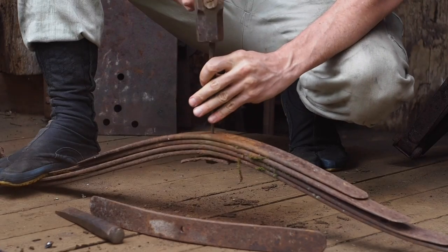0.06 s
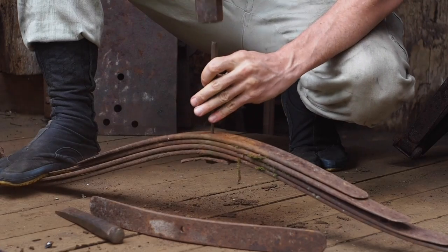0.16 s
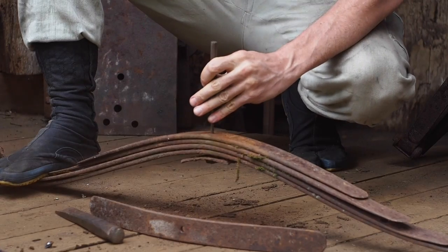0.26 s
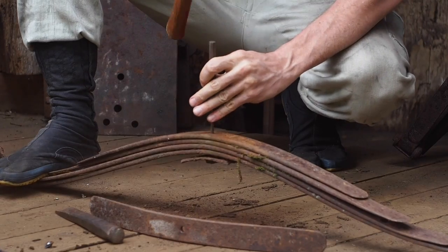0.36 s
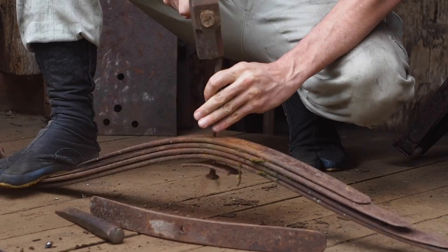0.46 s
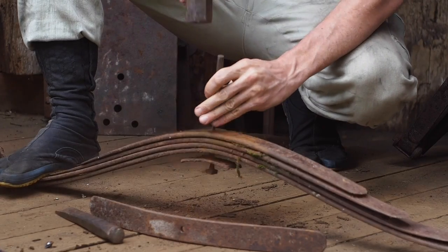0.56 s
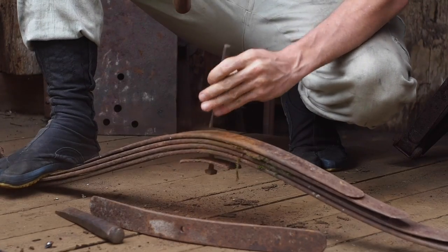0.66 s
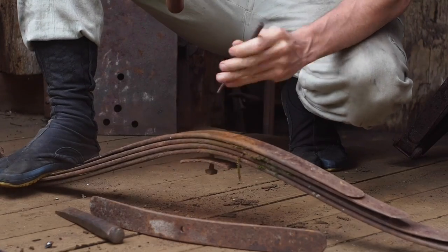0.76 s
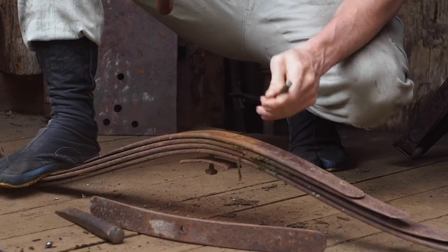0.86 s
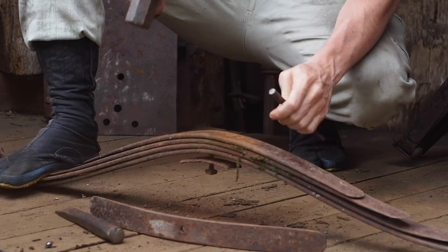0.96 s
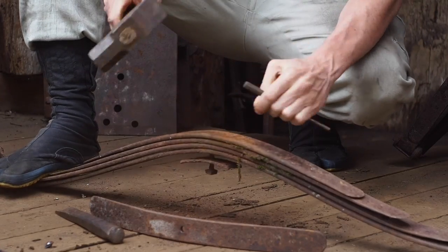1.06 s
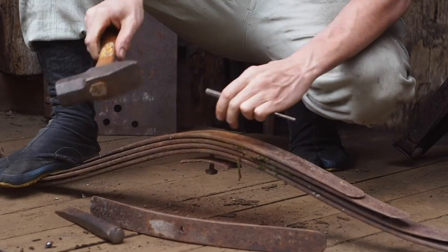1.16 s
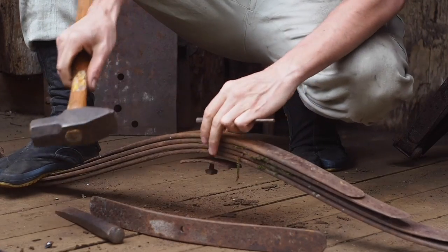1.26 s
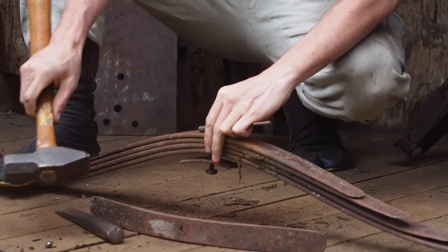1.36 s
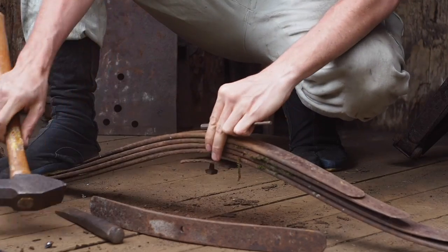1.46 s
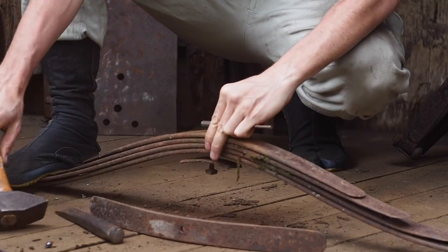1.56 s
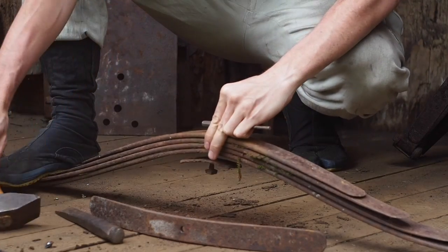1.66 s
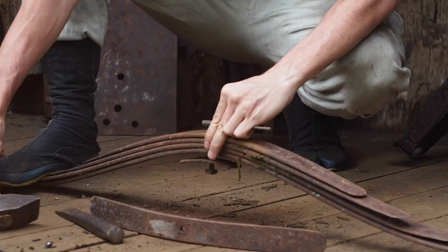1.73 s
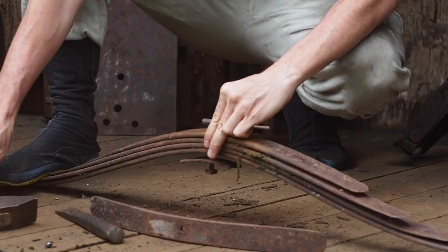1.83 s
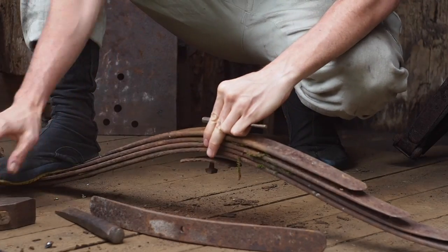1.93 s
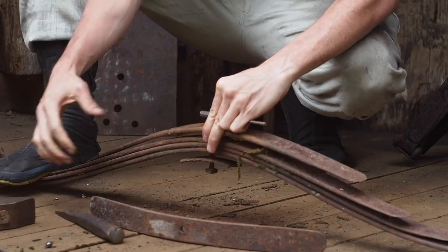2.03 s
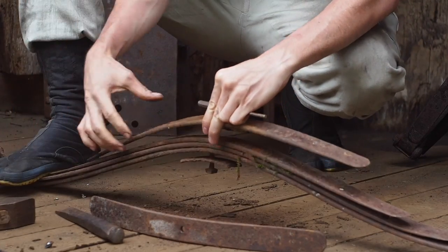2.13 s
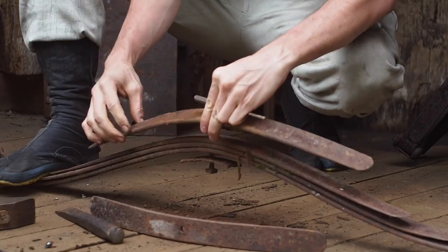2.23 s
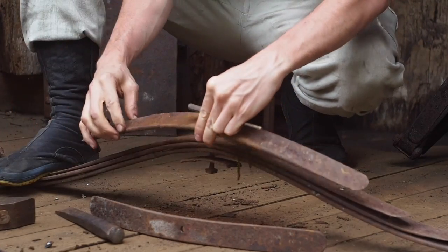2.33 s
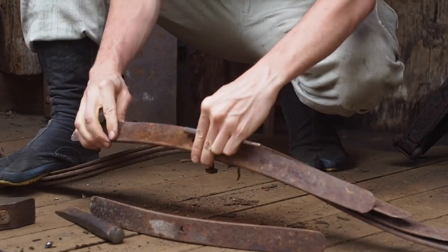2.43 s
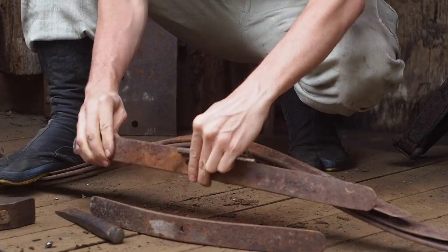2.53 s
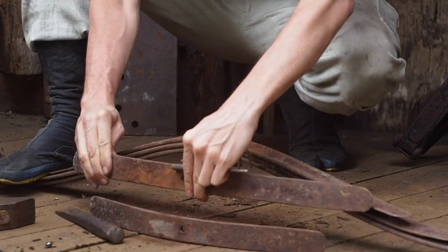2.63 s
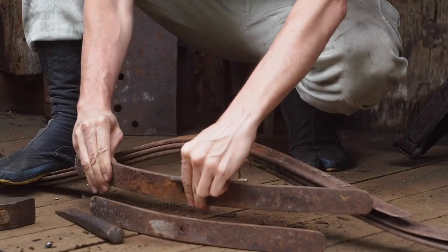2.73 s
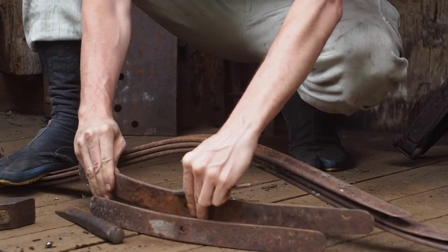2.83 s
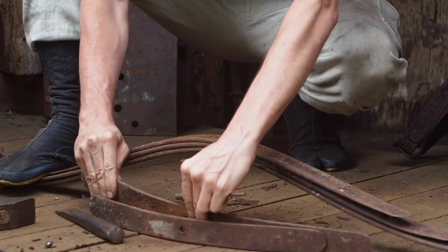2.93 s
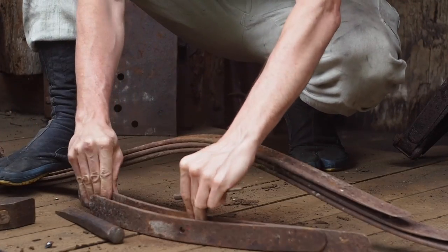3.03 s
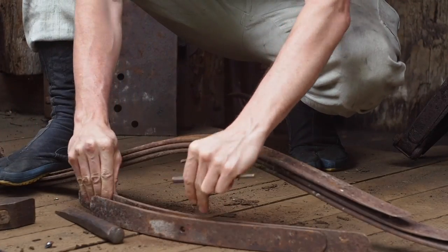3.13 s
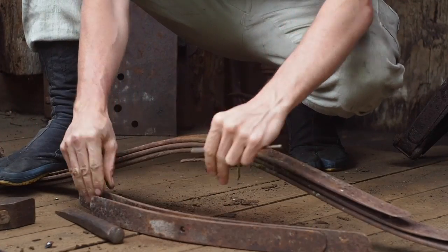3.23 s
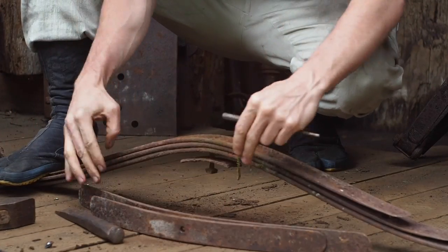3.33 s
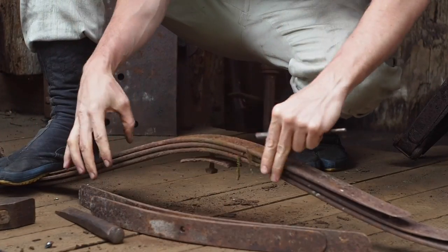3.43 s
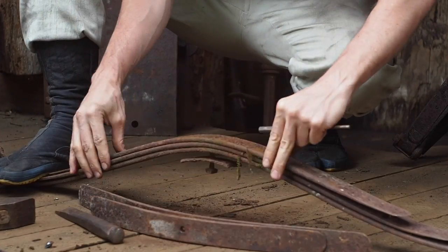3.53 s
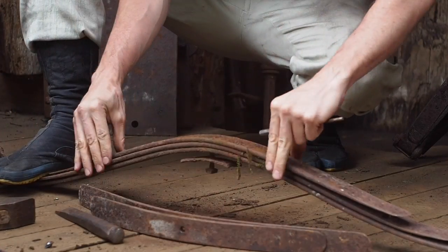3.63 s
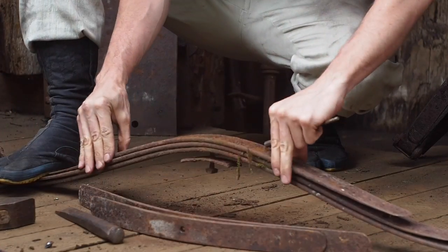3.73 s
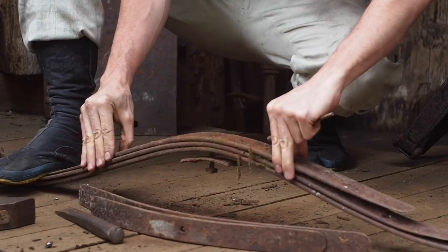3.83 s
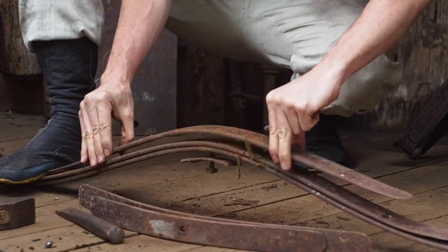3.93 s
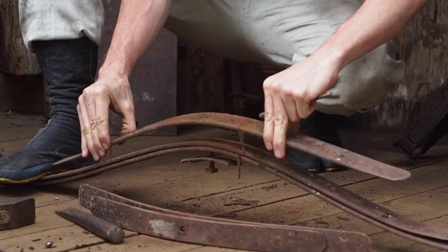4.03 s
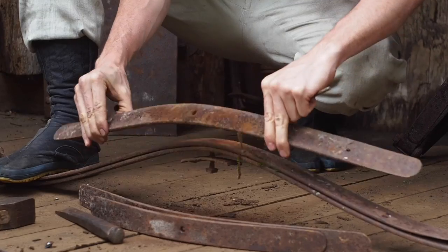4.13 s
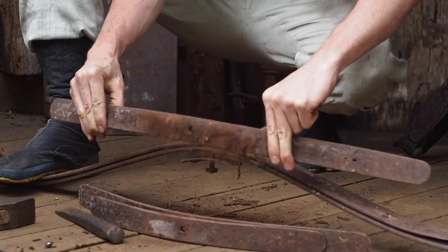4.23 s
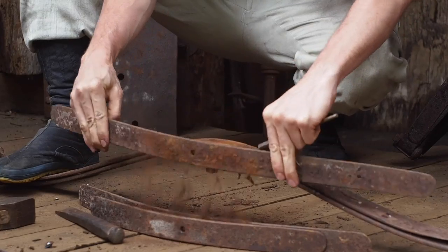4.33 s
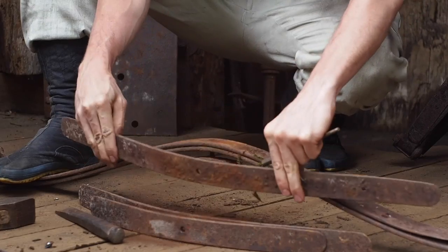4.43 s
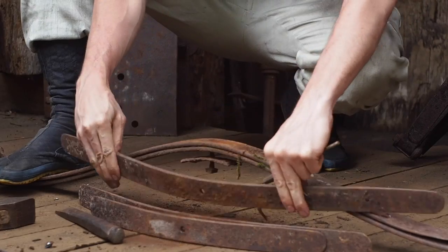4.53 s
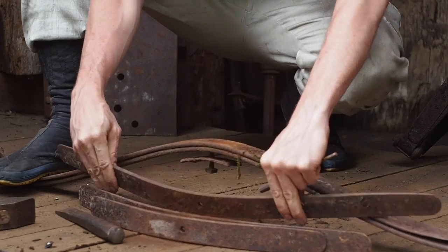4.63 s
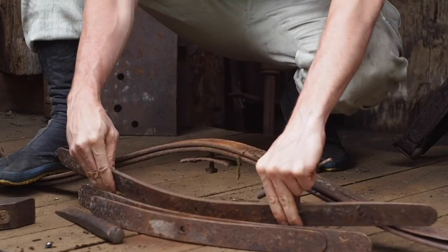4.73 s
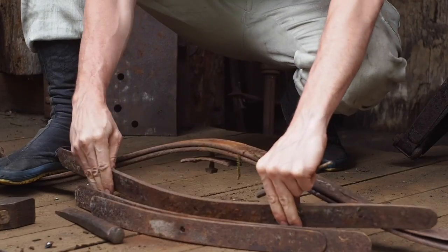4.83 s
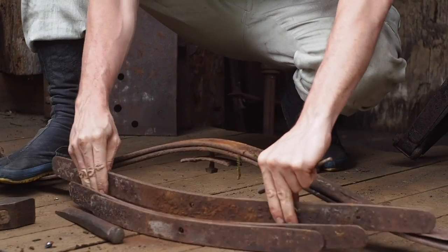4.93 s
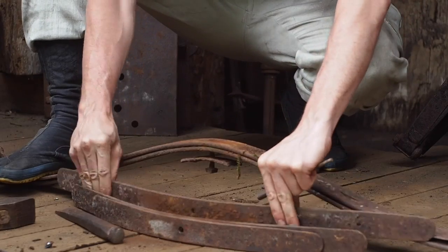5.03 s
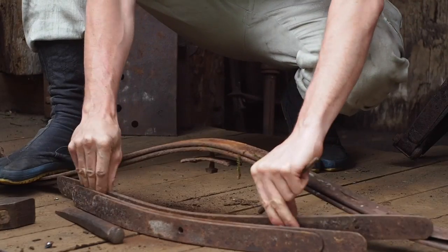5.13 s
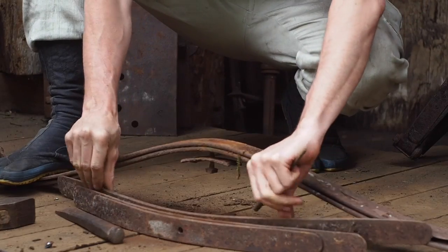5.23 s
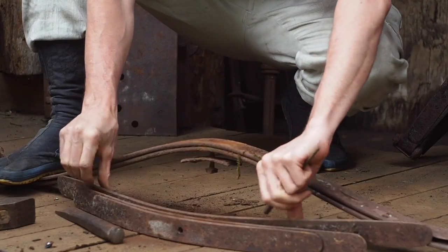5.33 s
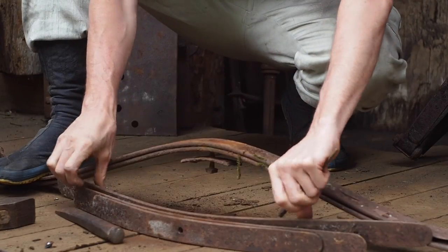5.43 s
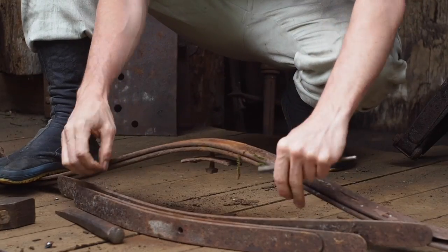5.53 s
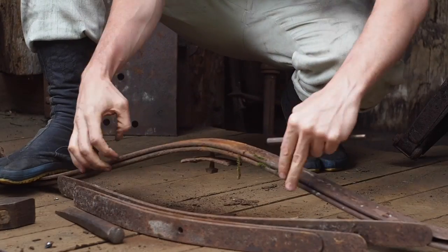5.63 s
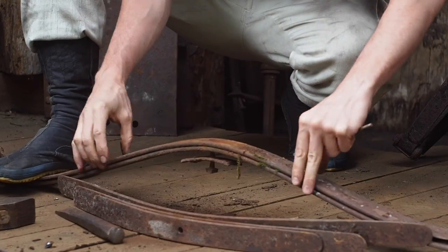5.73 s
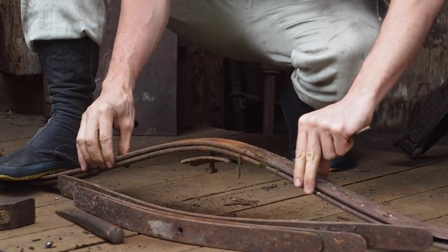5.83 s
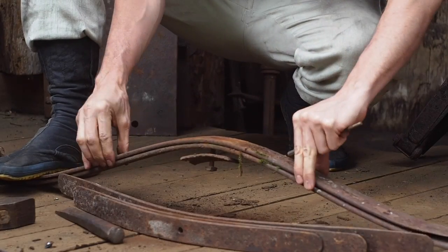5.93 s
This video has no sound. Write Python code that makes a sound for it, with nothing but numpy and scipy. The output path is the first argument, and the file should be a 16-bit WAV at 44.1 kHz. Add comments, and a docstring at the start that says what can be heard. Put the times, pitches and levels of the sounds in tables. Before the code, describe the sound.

Near stereo microphone, short woody room, faint low air noise. Two hammer strikes make stacked spring steel rattle and a punch sing thinly; a small pin tinkles. After a ringing clink the hammer lands and tips over on floorboards. One leaf clanks free and drops with a thud; a longer one is lifted quietly, then grates harshly onto the first and thumps down.

```python
"""A soft airy rush (shaped noise) fills a workshop while two hammer blows crack and make a punch sing.
The top leaf of a rusty spring chatters after each blow (damped sine modes plus grit); the loose pin falls.
The hammer topples before the loud drags: leaves are lifted off, dragged over each other (stick-slip grains)
and laid on the planks, which thud (noise slaps and wood modes). At the end the next leaf is nudged."""
import sys
import numpy as np
from scipy import signal
from scipy.fft import rfft, irfft, next_fast_len
from scipy.io import wavfile
from scipy.ndimage import map_coordinates

SR = 44100
rng = np.random.default_rng(int(sys.argv[2]) if len(sys.argv) > 2 else 0)


def unload_wav(signal):
    """Save mono or channel-first audio to the path in sys.argv[1] as 16-bit WAV at rate SR, clipped to [-1, 1]."""
    wavfile.write(
        sys.argv[1],
        SR,
        np.round(np.clip(np.atleast_2d(signal).T, -1, 1) * 32767).astype(np.int16),
    )


N = 263718

# Airy rush. Each row: frequency in Hz, density in dB per Hz.
AIR_SPECTRUM_HZ_DB = [(15, -51.5), (25, -28), (95, -9.5), (124, -7), (223, -7.5), (391, -2.5), (539, -6.5),
                      (599, -15.5), (742, -11), (1270, -21), (1450, -24), (1650, -24.5), (2470, -30.5),
                      (4100, -28.5), (14800, -42)]
# Rush level. Each row: time in seconds, level in dB.
AIR_LEVEL_S_DB = [(0, -56), (.8, -51.5), (1.3, -52.5), (2.3, -54), (2.7, -57.5), (3.4, -54), (3.9, -56),
                  (4.2, -52), (4.5, -57.5), (5.98, -56.5)]
# Stereo width of the rush. Each row: frequency in Hz, side gain in dB.
AIR_WIDTH_HZ_DB = [(60, -17), (400, -12), (1000, -6), (3000, 3), (10000, 0)]
# Stereo width of the near reflections. Each row: frequency in Hz, side gain in dB.
ROOM_WIDTH_HZ_DB = [(100, -23.5), (400, -20), (1000, -18), (2500, -7), (5000, -5.5), (9000, -1.5)]
# Channel balance. Each row: frequency in Hz, left minus right in dB.
BALANCE_HZ_DB = [(150, 1.3), (1000, 0), (5000, -2), (10000, -2)]
# Room tail. Each row: frequency in Hz, t60 in seconds.
ROOM_HZ_T60_S = [(150, 0.14), (1000, 0.58), (5000, 0.1), (12000, 0.06)]

# Weight landing on the planks. Each row: start in seconds, level in dB, contact hardness in Hz,
# time between rebounds in seconds, first rebound against the landing in dB.
THUDS = [(.040, -30, 1300, 0.019, -3), (0.435, -36.5, 1600, 0.029, -1), (0.484, -40.5, 1600, 0.023, -11),
         (0.554, -36.5, 1710, .02, -14.5), (1.597, -24, 675, .011, -2.5), (1.64, -36, 454, 0.011, -5.5),
         (1.896, -41, 404, 0.026, -6.5), (2.003, -33.5, 740, 0.028, -1), (2.075, -38, 990, 0.019, -3),
         (2.451, -42.5, 450, 0.018, -11), (2.956, -35.5, 825, .02, -33), (3.0577, -22, 760, .025, -18),
         (4.553, -36, 1020, 0.027, 4), (4.779, -42, 1190, .02, -3.5), (5.143, -25.5, 960, .011, -16),
         (5.812, -44.5, 810, 0.022, -9)]
# Plank modes. Each row: frequency in Hz, level in dB, t60 in seconds.
PLANK_MODES = [(114.4, -23.5, 0.11), (145, -12.5, 0.6), (166, -10, .25), (276, -1, 0.1084),
               (317, 3.5, 0.17), (352, 4, 0.14), (455.7, 2.5, .11), (596, 0, 0.052), (684, -7.5, .11),
               (908, 0.5, 0.043), (1081, -3.5, 0.14), (1443, -9.5, .1), (1790, -5, 0.13), (2020, -9, 0.059),
               (2180, -14, 0.079)]
# Wood noise. Each row: frequency in Hz, density in dB per Hz.
WOOD_SPECTRUM_HZ_DB = [(25, -26), (70, -10.5), (130, -2.5), (300, 1), (550, -2.5), (900, -6.5), (1300, -6),
                       (2600, -3), (4000, -13.5), (5500, -14), (9000, -20), (15000, -33.5)]
# Wood noise decay. Each row: frequency in Hz, t60 in seconds.
WOOD_HZ_T60_S = [(100, 0.26), (300, 0.18), (1000, 0.085), (3000, 0.13), (10000, .12)]
# Hammer toppling and bouncing on the boards. Each row: start in seconds, level in dB, contact hardness in Hz.
HAMMER_FALLS = [(1.912, -17.5, 5560), (1.924, -38, 6540), (2.002, -28, 1730)]
# Hammer knock modes. Each row: frequency in Hz, level in dB, t60 in seconds.
HAMMER_MODES = [(495, -15, 0.08), (654, -18, 0.042), (713.3, -2, 0.16), (950, 3.5, 0.13), (988, 2.5, 0.073),
                (1555, 2.5, 0.11), (1610, -4, 0.1), (1760, 4, 0.064), (2200, -19, 0.15), (2590, 5, 0.094),
                (2637, -32, 0.046), (2970, -16, 0.039), (3540, 1.5, 0.038), (3700, -14, 0.096),
                (5150, -7.5, 0.089)]

# Steel sliding on rust. Each row: start in seconds, length in seconds, rasp in dB, plank rumble in dB.
STROKES = [(0.919, .25, -83, -76), (1.617, 0.34, -69.5, -77), (2.444, 0.31, -64.5, -81),
           (2.768, 0.28, -59, -60), (4.181, 0.23, -63.5, -98.5), (4.593, 0.09, -47.5, -43),
           (4.812, 0.17, -45.5, -43), (5.02, 0.12, -47.5, -44), (5.164, 0.1, -50.5, -44.5),
           (5.751, .025, -55.5, -66.5), (5.828, 0.049, -47, -51.5), (5.904, 0.022, -42, -48.5)]
# Rasp of rust. Each row: frequency in Hz, density in dB per Hz.
RASP_SPECTRUM_HZ_DB = [(350, -27.5), (700, -8.5), (1200, -5.5), (1500, -7.5), (2200, -6.5), (4000, -3),
                       (6000, -8), (8500, -8.5), (10500, -21), (12000, -29.5), (15000, -45)]

# Contacts of the loose pin as it jumps and falls. Each row: start in seconds, ring in dB, clatter in dB,
# brightest frequency in Hz, spread in octaves, damping in dB/s.
PIN_HITS = [(.466, -24.5, -32.5, 6900, 0.35, 30), (.485, -37.5, -41, 7000, 1, 110),
            (.553, -36, -36, 4220, 0.5, 11), (.653, -40, -53.5, 7900, 0.075, 230)]
# The next leaf nudged on the stack. Each row: start in seconds, ring in dB, clatter in dB,
# brightest frequency in Hz, spread in octaves, damping in dB/s.
STACK_HITS = [(5.807, -38.5, -36, 3180, 0.81, 200), (5.896, -49, -46, 3720, 0.27, 50),
              (5.925, -35, -46, 3040, 0.71, 30)]
# Contacts of the longer leaf. Each row: start in seconds, ring in dB, clatter in dB,
# brightest frequency in Hz, spread in octaves, damping by hand or stack in dB/s.
LONG_LEAF_HITS = [(3.705, -64, -60, 4400, 0.2, 50), (3.96, -60, -62.5, 6300, 0.68, 42),
                  (4.019, -51.5, -61, 3750, 0.23, 9.2), (4.35, -60, -72, 5000, 0.36, 40),
                  (4.555, -48, -52, 2000, 0.2, 120), (4.574, -54, -40, 3510, 0.37, 150),
                  (4.778, -49.5, -50.5, 2000, 0.31, 64), (5.018, -46, -39, 5530, 1.5, 140),
                  (5.048, -34, -33.5, 3300, 0.83, 130), (5.057, -46, -36.5, 8000, 0.73, 110),
                  (5.264, -50.5, -55, 4970, 0.65, 210), (5.380, -39.5, -43.5, 4000, 0.68, 11)]
# Contacts of the short top leaf. Each row: start in seconds, ring in dB, clatter in dB,
# brightest frequency in Hz, spread in octaves, damping by hand or stack in dB/s.
TOP_LEAF_HITS = [(.010, -69, -56, 4600, 0.48, 100), (1.3183, -24.5, -37.5, 7500, 0.63, 2),
                 (1.582, -61, -58, 4600, .5, 62), (2.434, -48, -34, 4200, 0.76, 201),
                 (2.4404, -24, -28, 4930, 0.18, 111), (2.4709, -32, -29, 3605, 0.087, 61),
                 (2.868, -63, -62, 6000, 0.75, 40), (2.957, -43, -47.5, 5500, 1.3, 60),
                 (3.058, -56, -51, 6960, 0.75, 50), (3.101, -62, -50, 4450, 0.27, 150),
                 (3.115, -56, -50.5, 4430, 0.43, 150)]
# Pin modes. Each row: frequency in Hz, level in dB, t60 in seconds.
PIN_MODES = [(1938, -17, .38), (2697, -14, .36), (3510, -16, .6), (4285, -12, .36), (5024, -20, .25),
             (5626, -22, .44), (5809, -24, .45), (6843, -8, .47), (7768, -23, .31), (9835, -25, .47)]
# Stack modes. Each row: frequency in Hz, level in dB, t60 in seconds.
STACK_MODES = [(1965, -7.5, 0.16), (2825, -10, 0.11), (3000, 0, 0.056), (3474, -3.5, 0.071),
               (4400, -31, 0.092), (4430, -10, 0.11), (5100, 0, 0.044), (6210, -31, 0.18),
               (6900, -8, 0.063), (8300, -47, 0.3)]
# Longer leaf modes. Each row: frequency in Hz, level in dB, t60 in seconds.
LONG_LEAF_MODES = [(708, 2, 0.32), (1650, -12.5, 0.52), (1740, -11, 0.31), (1836, -7.5, 0.26),
                   (2330, -14, 0.27), (2360, -9, 0.1), (2763, -4.5, 0.43), (2850, -18, 0.22),
                   (3294, -12.5, 0.35), (3698, -2.5, 0.16), (4280, -8, 0.27), (4760, -13, 0.28),
                   (5464, -7.5, 0.21), (5830, -11, 0.12), (6660, -11, 0.19), (7500, -2, 0.16),
                   (7800, -14, 0.3), (7950, -8, 0.18), (8530, 0, 0.08), (9300, -21, 0.29)]
# Short top leaf modes. Each row: frequency in Hz, level in dB, t60 in seconds.
TOP_LEAF_MODES = [(1453, -26, .35), (1895, -12, .38), (2401, -9, .33), (2600, -7, .4), (2953, -12, .3),
                  (3595, -10, .3), (4253, -2, .19), (4635, -12, .16), (4791, -14, .22), (5000, -6, .18),
                  (5303, -14, .3), (5625, -5, .19), (5807, -2, .11), (6309, -14, .15), (6466, -8, .22),
                  (6654, -5, .22), (7363, -2, .2), (7544, -5, .23), (8086, -6, .15), (8498, -9, .18),
                  (9010, -13, .23), (9442, -16, .18), (9938, -12, .18), (10970, -22, .19)]
# Steel clatter. Each row: frequency in Hz, density in dB per Hz.
CLATTER_SPECTRUM_HZ_DB = [(200, -24), (700, -6), (1300, -1.5), (2600, 1.5), (6000, -6.5), (8800, -8),
                          (11000, -20), (15000, -34.5)]
# Steel clatter decay. Each row: frequency in Hz, t60 in seconds.
CLATTER_HZ_T60_S = [(500, 0.54), (3000, 0.047), (7000, 0.23), (13000, 0.16)]

# Hammer on punch. Each row: start in seconds, crack in dB, crack t60 in seconds,
# punch tone in dB (6 dB below its starting peak), leaf ring in dB, leaf clatter in dB,
# clatter loss per chatter contact in dB, brightest frequency in Hz, damping by the stack in dB/s.
BLOWS = [(0.0343, -20, 0.065, -45.5, -36, -28.5, 9, 4860, 108),
         (0.4273, -1.5, 0.008, -63.5, -21.5, -28, 1.1, 6065, 42.5)]
# Crack of a blow. Each row: frequency in Hz, density in dB per Hz.
CRACK_SPECTRUM_HZ_DB = [(200, -20), (1500, -22.5), (3200, -13.5), (5000, 11.5), (8000, 6.5), (10000, 4),
                        (12000, -10), (15500, -21)]

TOP_HZ = 15800
SETTLE_DB = 7  # second rebound below the first
STROKE_RISE_SHARE, STROKE_STOP_T60_S = .3, .15  # share of a stroke spent gathering speed; coming to rest
# Top leaf on the stack after a blow: contact interval, brightness ratio per contact, spread, later ring drop
CHATTER_S, CHATTER_DULLING, CHATTER_OCTAVES, CHATTER_DROP_DB = .0245, .86, .4, 12
PUNCH_HZ, PUNCH_T60_S = 1701, 2.6


def amp(db):
    """Decibels to gain."""
    return 10 ** (np.asarray(db) / 20)


def unit(x):
    """Scale to rms 1."""
    return x / np.sqrt(np.mean(x ** 2) + 1e-20)


def unit_attack(x):
    """Scale a hit so that its first 25 ms have rms 1."""
    return x / np.sqrt(np.mean(x[:SR // 40] ** 2) + 1e-20)


def along(points, hz):
    """Interpolate (Hz, value) points on a log frequency axis."""
    point_hz, values = np.transpose(points)
    return np.interp(np.log(hz + 1), np.log(point_hz + 1), values)


def add(track, start_s, sound):
    """Mix a sound into a track at a time."""
    part = track[max(round(start_s * SR), 0):][:len(sound)]
    part += sound[:len(part)]


def coloured(x, gain):
    """Filter x by a gain that depends on frequency."""
    size = next_fast_len(len(x) + SR // 8)
    hz = np.fft.rfftfreq(size, 1 / SR)
    return irfft(rfft(x, size) * gain(hz), size)[:len(x)]


def noise(spectrum, size):
    """Noise of rms 1 with a (Hz, dB) spectrum."""
    return unit(coloured(rng.standard_normal(size), lambda hz: amp(along(spectrum, hz))))


def decay(x, t60_s):
    """Exponential decay, 60 dB per t60."""
    return x * np.exp(-np.log(1000) * np.arange(len(x)) / SR / t60_s)


def dying_noise(gain, hz_t60_s):
    """Countless close modes: noise whose bands each die at their own speed."""
    hz, t, bands = signal.stft(rng.standard_normal(SR // 2), SR, nperseg=256)
    fade = amp(-60 * t / along(hz_t60_s, hz)[:, None])
    tail = signal.istft(bands * fade, SR, nperseg=256)[1]
    return unit_attack(coloured(tail, gain))


def mode_bank(modes, phase_spread_cycles, attack_s):
    """One damped sine per mode; a phase spread makes them arrive out of step."""
    hz, db, t60_s = np.transpose(modes)[:, :, None]
    t = np.arange(SR * 3 // 5) / SR
    phase = phase_spread_cycles * rng.random(hz.shape)
    sines = np.sin(2 * np.pi * (hz * t + phase))
    envelope = np.exp(-np.log(1000) * t / t60_s) * (1 - np.exp(-t / attack_s))
    return amp(db) * envelope * sines


def close_modes(count):
    """The many lesser bending and twisting modes of a steel leaf: (Hz, dB, t60 s)."""
    hz = 500 + 13500 * (np.arange(count) + rng.random(count)) / count
    return np.transpose([hz, along(CLATTER_SPECTRUM_HZ_DB, hz), along(CLATTER_HZ_T60_S, hz)])


def ringing(bank, gains):
    """Every contact excites the modes at slightly new strengths."""
    strengths = gains * amp(1.5 * rng.standard_normal(len(bank)))
    return unit_attack(strengths @ bank)


def air():
    """A soft rush of slowly varying level, nearly mono in the bass."""
    mid = noise(AIR_SPECTRUM_HZ_DB, size=N)
    side = coloured(noise(AIR_SPECTRUM_HZ_DB, size=N), lambda hz: amp(along(AIR_WIDTH_HZ_DB, hz)))
    level_db = np.interp(np.arange(N) / SR, *np.transpose(AIR_LEVEL_S_DB))
    return amp(level_db) * np.array([mid + side, mid - side])


def workshop(x, wet_db, early_t60_s):
    """Near reflections spread the treble between the ears; a short tail follows."""
    early = decay(rng.standard_normal(SR // 8), early_t60_s)
    early /= np.linalg.norm(early)
    tail = dying_noise(np.ones_like, ROOM_HZ_T60_S)
    tail /= np.linalg.norm(tail)
    mid = x + amp(wet_db) * signal.fftconvolve(x, tail)[:N]
    side = coloured(signal.fftconvolve(x, early)[:N], lambda hz: amp(along(ROOM_WIDTH_HZ_DB, hz)))
    left = coloured(mid + side, lambda hz: amp(along(BALANCE_HZ_DB, hz) / 2))
    right = coloured(mid - side, lambda hz: amp(-along(BALANCE_HZ_DB, hz) / 2))
    return np.array([left, right])


def landings():
    """A weight lands on the planks, rebounds and settles: (s, dB, hardness Hz)."""
    hits = []
    for start_s, db, hard_hz, gap_s, rebound_db in THUDS:
        for k, step_db in enumerate([0, rebound_db, rebound_db - SETTLE_DB]):
            hits.append((start_s + k * gap_s, db + step_db, hard_hz))
    return hits


def knocks(hits, modes, dense_db, slap_db, slap_t60_s):
    """A slap, then the modes ring; a soft contact only reaches the low ones."""
    track, bank = np.zeros(N), mode_bank(modes, 0, attack_s=.0001)
    for start_s, db, hard_hz in hits:
        boom = ringing(bank, 1)
        dense = dying_noise(lambda hz: amp(along(WOOD_SPECTRUM_HZ_DB, hz)), WOOD_HZ_T60_S)
        slap = decay(noise(WOOD_SPECTRUM_HZ_DB, size=SR // 8), slap_t60_s)
        add(boom, 0, amp(dense_db) * dense)
        add(boom, 0, amp(slap_db) * slap)
        softness = signal.butter(3, min(hard_hz, SR / 3), fs=SR, output="sos")
        add(track, start_s, amp(db) * unit_attack(signal.sosfilt(softness, boom)))
    return track


def stroke_gains():
    """Each stroke gathers speed, holds it and comes to rest; rasp and rumble follow the speed."""
    t, rasp, rumble = np.arange(N) / SR, np.zeros(N), np.zeros(N)
    for start_s, length_s, rasp_db, rumble_db in STROKES:
        rise = np.clip((t - start_s) / (STROKE_RISE_SHARE * length_s), 0, 1)
        stopping_s = np.maximum(t - start_s - length_s, 0)
        speed = rise * np.exp(-np.log(1000) * stopping_s / STROKE_STOP_T60_S)
        rasp += amp(rasp_db) * speed
        rumble += amp(rumble_db) * speed
    return rasp, rumble


def rust_grains():
    """One spot of rust sticks and slips, so its grains come in clumps."""
    catches = rng.random(N) < 400 / SR  # 400 per second on average
    slip_db = 3.5 * map_coordinates(rng.standard_normal(N // 700 + 4), [np.arange(N) / 700])
    grain_db = 4.5 * np.clip(rng.standard_normal(N), -2, 2)
    return catches * rng.choice([-1, 1], N) * amp(slip_db + grain_db)


def sliding(ring_db, leaf_t60_s, count):
    """Rust spots catch and let go: they hiss, shake the boards and ring a hand-damped leaf's modes."""
    rasp, rumble = stroke_gains()
    grains, leaf = np.zeros(N), np.zeros(N)
    for _ in range(count):
        spot, modes = rust_grains(), close_modes(count=24)
        bank = mode_bank(modes, 0.91, attack_s=0.0002)
        # replace the clatter levels in the bank by the rasp spectrum
        gains = amp(along(RASP_SPECTRUM_HZ_DB, modes[:, 0]) - modes[:, 1])
        body = decay(ringing(bank, gains), leaf_t60_s)
        grains += spot
        leaf += signal.fftconvolve(spot, body)[:N]
    hiss = unit(coloured(grains, lambda hz: amp(along(RASP_SPECTRUM_HZ_DB, hz))))
    boards = unit(coloured(grains, lambda hz: amp(along(WOOD_SPECTRUM_HZ_DB, hz)) / (1 + (hz / 700) ** 2)))
    return rasp * unit(hiss + amp(ring_db) * unit(leaf)) + rumble * boards


def contact_gain(hz, bright_hz, octaves):
    """A contact favours one region of the modes, 3 dB down at the spread on either side."""
    return 1 / np.sqrt(1 + (np.log2((hz + 1) / bright_hz) / octaves) ** 2)


def steel(hits, modes, grit_db, grit_t60_s, attack_s):
    """Steel on steel: contacts ring the modes, crushed rust adds grit, and damping shortens the ring."""
    track, lesser = np.zeros(N), close_modes(count=110)
    main_bank = mode_bank(modes, 0.89, attack_s)
    lesser_bank = mode_bank(lesser, 0.56, attack_s)
    main_hz, lesser_hz = np.array(modes)[:, 0], lesser[:, 0]
    t = np.arange(main_bank.shape[1]) / SR
    for start_s, ring_db, clatter_db, bright_hz, octaves, damping_db_per_s in hits:
        def grit_gain(hz):
            return contact_gain(hz, bright_hz, octaves) * amp(along(CLATTER_SPECTRUM_HZ_DB, hz))

        ring = ringing(main_bank, contact_gain(main_hz, bright_hz, octaves))
        signs = rng.choice([-1, 1], len(lesser))
        clatter = ringing(lesser_bank, contact_gain(lesser_hz, bright_hz, octaves) * signs)
        grit = coloured(decay(rng.standard_normal(SR // 5), grit_t60_s), grit_gain)
        add(clatter, 0, amp(grit_db) * unit_attack(grit))
        clank = amp(ring_db) * ring + amp(clatter_db) * unit_attack(clatter)
        add(track, start_s, clank * amp(-abs(damping_db_per_s) * t))
    return track


def chatter():
    """The top leaf takes each blow, then bounces on the stack, ever duller, its clatter ever softer."""
    hits = []
    for start_s, _, _, _, ring_db, clatter_db, loss_db, bright_hz, damping_db_per_s in BLOWS:
        for k in range(4):
            hits.append((start_s + 0.0013 + k * CHATTER_S,
                         ring_db - CHATTER_DROP_DB * (k > 0),
                         clatter_db - k * loss_db,
                         bright_hz * CHATTER_DULLING ** k,
                         CHATTER_OCTAVES, damping_db_per_s))
    return hits


def punch():
    """Each blow cracks, stops the punch's old tone and starts a new one."""
    cracks, tone, t = np.zeros(N), np.zeros(N), np.arange(2 * SR) / SR
    for start_s, crack_db, crack_t60_s, tone_db, *_ in BLOWS:
        crack = decay(noise(CRACK_SPECTRUM_HZ_DB, size=SR // 8), crack_t60_s)
        add(cracks, start_s, amp(crack_db) * crack)
        tone[round(start_s * SR):] = 0
        sine = np.sin(2 * np.pi * PUNCH_HZ * t)
        add(tone, start_s, amp(tone_db + 6) * decay(sine, PUNCH_T60_S))
    # keep the crack and punch tone thin and bright
    low_cut = signal.butter(3, 900, "highpass", fs=SR, output="sos")
    return signal.sosfilt(low_cut, cracks + tone)


def scene():
    """Tools, spring and floor in the workshop, over the airy rush."""
    floor = knocks(landings(), PLANK_MODES, dense_db=2.5, slap_db=8.5, slap_t60_s=.018)
    hammer = knocks(HAMMER_FALLS, HAMMER_MODES, dense_db=-1.0, slap_db=10.5, slap_t60_s=0.012)
    slide = sliding(ring_db=9, leaf_t60_s=0.55, count=5)
    pin = steel(PIN_HITS, PIN_MODES, grit_db=-0.5, grit_t60_s=.12, attack_s=0.0053)
    stack = steel(STACK_HITS, STACK_MODES, grit_db=-3.5, grit_t60_s=0.22, attack_s=0.00061)
    long_leaf = steel(LONG_LEAF_HITS, LONG_LEAF_MODES, grit_db=0, grit_t60_s=0.1, attack_s=.0008)
    top_leaf_hits = list(chatter()) + list(TOP_LEAF_HITS)
    top_leaf = steel(top_leaf_hits, TOP_LEAF_MODES, grit_db=-3, grit_t60_s=0.15, attack_s=.0006)
    work = floor + hammer + slide + pin + stack + long_leaf + top_leaf + punch()
    # keep the deep bass of the hits weak
    low_cut = signal.butter(3, 98, "highpass", fs=SR, output="sos")
    return workshop(signal.sosfilt(low_cut, work), wet_db=-17.5, early_t60_s=0.085) + air()


def record(dry):
    """Clip at full scale, then remove everything from the band limit up."""
    clipped = np.clip(dry, -1, 1)
    return np.array([coloured(channel, lambda hz: hz < TOP_HZ) for channel in clipped])


dry = scene()
out = record(dry)
unload_wav(out)
```